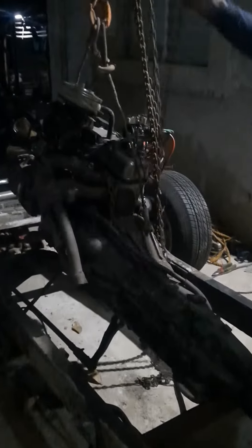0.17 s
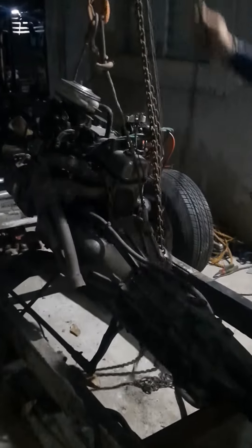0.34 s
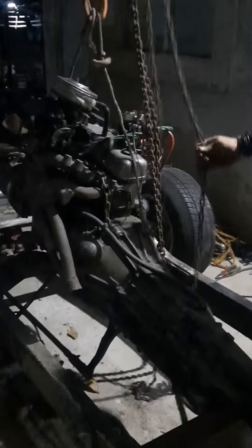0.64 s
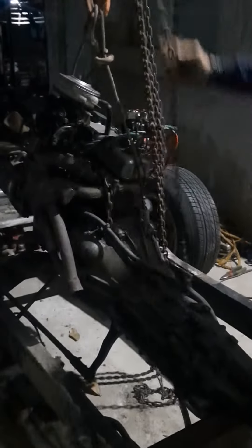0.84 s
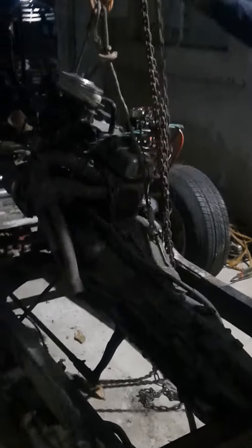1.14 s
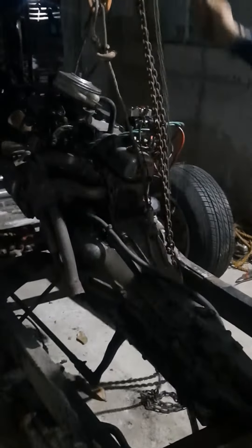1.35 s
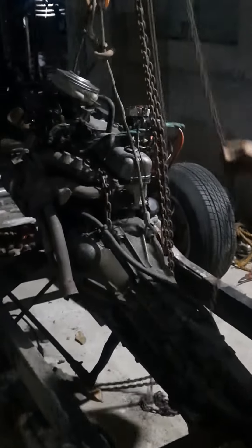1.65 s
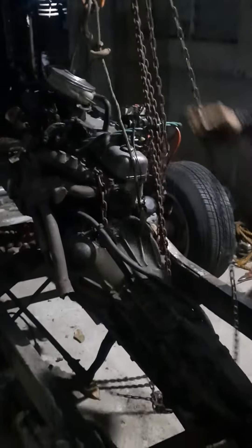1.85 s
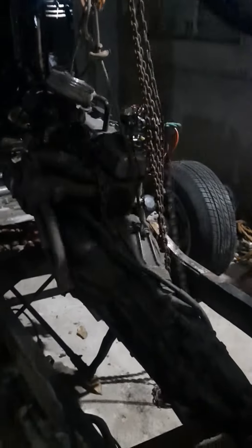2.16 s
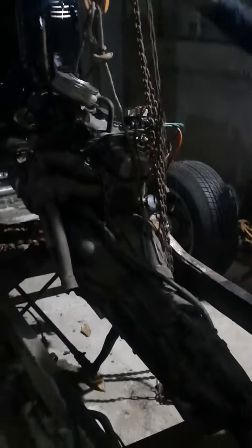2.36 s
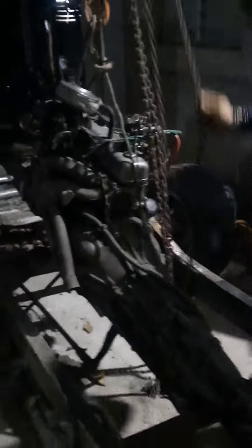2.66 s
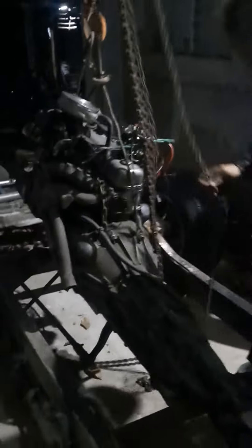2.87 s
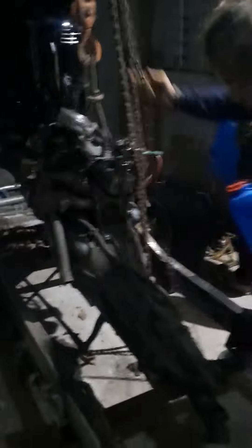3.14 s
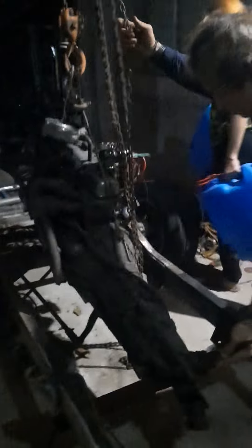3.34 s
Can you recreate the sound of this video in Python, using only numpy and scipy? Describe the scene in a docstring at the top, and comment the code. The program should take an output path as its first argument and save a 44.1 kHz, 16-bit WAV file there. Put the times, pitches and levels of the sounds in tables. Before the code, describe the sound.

A hand chain hoist is hauled three times, each pull a burst of steel rattling and clacking over a low rumble. Slack chain clinks and scrapes softly between pulls, and the last one squeaks briefly, in a small workshop.

```python
"""Steel rattles and clacks in three bursts: a hand chain hoist is being hauled in a small workshop.
In each stroke, impacts of the links on the wheel and of the pawl excite the resonances of the housing,
while the beam overhead rumbles in forced vibration. Between strokes the slack chain clinks by collision
and scrapes by sliding friction. In the last stroke, stick-slip friction makes the loaded wheel squeak."""
import sys
import numpy as np
from scipy import signal
from scipy.fft import rfft, irfft, next_fast_len
from scipy.io import wavfile
from scipy.ndimage import uniform_filter1d, map_coordinates

SR = 44100
rng = np.random.default_rng(int(sys.argv[2]) if len(sys.argv) > 2 else 0)


def inscribe(sig):
    """Save sig as 16-bit PCM at rate SR to the path in sys.argv[1].

    A 1-D sig is mono; a 2-D sig holds one channel per row.
    Samples are clipped to [-1, 1] before scaling.
    """
    pcm = np.round(np.clip(np.atleast_2d(sig).T, -1, 1) * 32767)
    wavfile.write(sys.argv[1], SR, pcm.astype(np.int16))


N = 154350

# reverberation of the workshop (frequency [Hz], time to decay by 60 dB [s])
ROOM_T60 = [(200, 0.4), (1500, 0.28), (5000, 0.29), (9000, 0.22), (15000, 0.29)]
# likeness of the diffuse field at the two ears (frequency [Hz], coherence [ratio])
COHERENCE = [(120, 0.97), (280, 0.85), (600, 0.42), (3000, 0.017)]
# level difference between the ears (frequency [Hz], left over right [dB])
EAR_BALANCE = [(400, 2.16), (1100, -.5), (4200, 1), (8000, 2.5), (11500, 3.5), (15000, 1)]
# spectral envelopes of the sources (frequency [Hz], relative level [dB])
AIR_SPECTRUM = [(25, -35), (60, -0.5), (300, -6.5), (650, -15.5), (1500, -25.5), (15000, -44.5)]
BEAM_SPECTRUM = [(20, -16), (36, -23), (58, 6.5), (82, -8.5), (108, 2.5), (122, 0), (135, 10.5), (152, 3),
                 (195, -10), (290, -1), (400, -14.5), (1200, -22), (4000, -45)]
SLIDE_SPECTRUM = [(200, 8), (700, 4.5), (2400, 0), (3100, -3), (15000, -14.5)]
CLINK_SPECTRUM = [(300, -25), (2800, -5), (4000, 1.5), (7700, 3), (9000, -4.5), (15000, -10)]
JERK_SPECTRUM = [(80, -4.5), (215, 14), (480, -4.5), (1400, 8), (2300, -14.5), (15000, -34)]
STEEL_SPECTRUM = [(150, -7.5), (450, -4), (1000, -7), (1700, 3.5), (2400, -5), (3050, 0), (3800, 2),
                  (7400, -1), (8500, -1), (15700, -2.5)]
# resonances of the steel housing (frequency [Hz], bandwidth [Hz], relative level [dB])
HOUSING_MODES = [(720, 152, 3), (1460, 100, -2), (2106, 75, -0.5), (2354, 190, 1), (2600, 77, 0.5),
                 (3910, 160, -3.5), (4380, 390, -4), (5410, 150, -1.5), (5890, 104, -2.5),
                 (7250, 650, -4.5), (7710, 410, -1), (11500, 1060, -3)]

# Event levels are relative: each source is filtered and scaled afterwards.
# the strokes (full speed from [s], until [s], run-up [s], rattle level [dB], beam level [dB])
PULLS = [(0.271, 0.593, 0.041, -31.5, -38.5), (1.327, 1.681, 0.04, -29.5, -35),
         (2.492, 2.82, 0.097, -29.5, -35.5)]
# the beam booms as the load shifts (time [s], duration [s], level [dB])
BEAM_BOOMS = [(0.091, 0.13, -41.5), (0.486, 0.16, -37), (0.746, 0.2, -39), (1.645, 0.051, -34),
              (2.51, 0.033, -36), (2.645, 0.063, -38.5)]
# slack chain slides as the hand takes a new grip (time [s], duration [s], level [dB])
CHAIN_SLIDES = [(0.108, 0.13, -51.5), (0.904, 0.11, -50.5), (1.883, 0.062, -48), (2.061, 0.14, -49),
                (2.279, 0.15, -53), (3.002, 0.062, -46), (3.152, 0.078, -46.5), (3.24, 0.091, -48)]
# slack links knock together (time [s], level [dB], centre frequency of the ring [Hz])
LINK_CLINKS = [(0.0636, -28, 6510), (0.133, -34, 4070), (0.1426, -23, 4535), (0.237, -26, 4100),
               (1.264, -20.5, 4330), (2.263, -20.5, 5610), (2.389, -28, 5050), (2.997, -30.5, 8100),
               (3.2825, -36.5, 4400), (3.336, -30, 7240), (3.3415, -28, 5100), (3.46, -33, 4630)]
# hanging links clash as the chain is snatched or let go (time [s], duration [s], level [dB])
LINK_CLASHES = [(0.802, 0.019, -38), (1.334, 0.026, -26.5), (2.273, 0.031, -36.5), (2.476, 0.02, -20)]
# the chain snaps taut (time [s], level [dB])
CHAIN_JERKS = [(1.325, -22), (1.351, -30.5), (2.482, -30), (2.511, -27.5)]
# the loaded wheel squeaks (time [s], duration [s], start pitch [Hz], end pitch [Hz], level [dB])
WHEEL_SQUEAKS = [(2.499, 0.046, 708, 683, -29), (2.753, 0.054, 686, 701, -32.5),
                 (2.79, 0.0785, 920, 1037, -34)]
# pawl and links strike inside the hoist (time [s], level [dB])
PAWL_CLACKS = [(0.2629, -17), (0.2866, -18), (0.3207, -20.5), (0.3696, -12.5), (0.408, -14.5),
               (0.445, -13.5), (0.473, -10), (0.4864, -13.5), (0.5107, -10.5), (0.563, -11.5), (0.599, -29),
               (0.6493, -19.5), (0.684, -20.5), (0.717, -19.5), (0.7943, -22), (0.9996, -23.5),
               (1.3513, -11), (1.386, -23), (1.402, -16.5), (1.4358, -11.5), (1.4659, -11.5),
               (1.4805, -11.5), (1.511, -12), (1.553, -16), (1.575, -13), (1.588, -11), (1.6207, -13.5),
               (1.6642, -11.5), (1.7088, -15), (1.7807, -17), (2.048, -30.5), (2.409, -18), (2.4318, -17),
               (2.4767, -15.5), (2.4861, -13.5), (2.5326, -12), (2.611, -9.5), (2.6531, -9),
               (2.6768, -11.5), (2.6874, -8.5), (2.7193, -10.5), (2.7504, -11), (2.7795, -12.5),
               (2.821, -17.5), (2.8558, -16.5), (2.9137, -13.5), (3.377, -31.5)]


def amp(db):
    """Amplitude ratio of a level in decibels."""
    return 10 ** (np.asarray(db) / 20)


def unit(x):
    """Normalisation to an rms of 1."""
    return x / np.sqrt(np.mean(x ** 2) + 1e-20)


def along(points, hz):
    """Interpolation of (frequency, value) points on a logarithmic frequency axis."""
    frequencies, values = np.transpose(points)
    return np.interp(np.log(hz + 1), np.log(frequencies + 1), values)


def tone(spectrum):
    """Gain of a spectral envelope as a function of frequency."""
    return lambda hz: amp(along(spectrum, hz))


def wobble(per_s):
    """Random modulation: a smooth curve through per_s random values a second."""
    knots = rng.standard_normal(int(N * per_s / SR) + 4)
    return map_coordinates(knots, [np.arange(N) * per_s / SR])


def swell(length_s):
    """Amplitude envelope with a rounded rise and fall."""
    return np.sqrt(np.hanning(int(length_s * SR)).clip(0))


def add(track, start_s, sound):
    """Superposition of a sound on the track."""
    part = track[max(0, round(start_s * SR)):][:len(sound)]
    part += sound[:len(part)]


def filtered(x, response):
    """Linear filtering: the spectrum of x is multiplied by a frequency response."""
    size = 2 * next_fast_len(N // 2 + SR // 4)
    return irfft(rfft(x, size) * response(np.fft.rfftfreq(size, 1 / SR)), size)[..., :N]


def coloured(x, gain):
    """Minimum-phase filtering by a gain curve scaled to unit power."""
    def response(hz):
        cepstrum = irfft(np.log(np.maximum(unit(gain(hz)), 1e-6)))
        middle = len(cepstrum) // 2
        cepstrum[1:middle] *= 2  # folding onto positive time makes the filter causal
        cepstrum[middle + 1:] = 0
        return np.exp(rfft(cepstrum))
    return filtered(x, response)


def spread(hz):
    """Interaural coherence as mid and side gains: long waves reach both ears alike."""
    angle = np.arccos(np.clip(along(COHERENCE, hz), -1, 1)) / 2
    return np.array([np.cos(angle), np.sin(angle)])


def diffuse(spectrum):
    """A diffuse field: partly coherent stereo noise of rms 1."""
    mid, side = filtered(rng.standard_normal((2, N)), lambda hz: tone(spectrum)(hz) * spread(hz))
    return unit(np.array([mid + side, mid - side]))


def room(x, tail_db, direct_db=-3, wall_db=-5, wall_s=0.008, echoes=8, pieces=30):
    """Direct sound, early reflections and reverberation, drawn anew piece by piece as the chain swings."""
    out = np.zeros((2, N))
    for k, piece in enumerate(np.array_split(x, pieces)):
        hz, t, noise = signal.stft(rng.standard_normal((2, SR // 2)), SR, nperseg=256)
        decay = amp(-60 * t / along(ROOM_T60, hz)[:, None])
        mid, side = signal.istft(noise * spread(hz)[..., None] * decay, SR, nperseg=256)[1]
        for ear, tail in zip(out, (mid + side, mid - side)):
            response = amp(tail_db) * tail / np.linalg.norm(tail)
            response[0] += amp(direct_db)
            delays = (rng.random(echoes) * wall_s * SR).astype(int)
            response[delays] += amp(wall_db) * rng.standard_normal(echoes) / np.sqrt(echoes)
            add(ear, k * N / pieces / SR, signal.fftconvolve(piece, response))
    return out


def stroke_db(start, stop, rise_s, decay_db_per_s, slack_db=-12):
    """Level of a stroke: exponential growth as slack is taken up, a plateau, then exponential decay."""
    t = np.arange(N) / SR
    return slack_db * np.maximum((start - t) / rise_s, 0) - decay_db_per_s * np.maximum(t - stop, 0)


def strike(crack_t60, ring_hz, ring_db, ring_t60=0.032, scatter=0.1627, partials=5):
    """Impact on steel: a noisy crack and the damped free vibration of a link's inharmonic modes."""
    t = np.arange(SR // 8) / SR
    hz = ring_hz * np.exp(scatter * rng.standard_normal((partials, 1)))
    ring = unit(np.sin(2 * np.pi * hz * t).sum(0)) * amp(-60 * t / ring_t60)
    crack = rng.standard_normal(len(t)) * amp(-60 * t / crack_t60)
    return crack + amp(ring_db) * ring


def air():
    """Ambient noise: a faint, steady, low-pitched diffuse field."""
    return amp(-48) * diffuse(AIR_SPECTRUM)


def beam(sway_db=0.5):
    """Forced vibration: the beam rumbles with each stroke, sways on, and booms when the load shifts."""
    sway, booms = np.zeros(N), np.zeros(N)
    for start, stop, rise_s, _, db in PULLS:
        sway += amp(db + sway_db + stroke_db(start, stop, rise_s, decay_db_per_s=25))
    for start, length, db in BEAM_BOOMS:
        add(booms, start, amp(db) * swell(length))
    rumble = diffuse(BEAM_SPECTRUM)
    local_power = uniform_filter1d(np.mean(rumble ** 2, axis=0), size=SR // 12)
    even_rumble = rumble / np.sqrt(np.abs(local_power) + 1e-9)
    return np.hypot(sway, booms) * even_rumble


def slides(grain_db=3, grains_per_s=150):
    """Sliding friction: the slack chain scrapes softly and unevenly."""
    envelope = np.zeros(N)
    for start, length, db in CHAIN_SLIDES:
        add(envelope, start, amp(db) * swell(length))
    friction = unit(amp(grain_db * wobble(grains_per_s)) * rng.standard_normal(N))
    return coloured(envelope * friction, tone(SLIDE_SPECTRUM))


def clinks(gain_db=-2):
    """Brief, hard contact has a bright spectrum: single knocks between hanging links."""
    out = np.zeros(N)
    for start, db, hz in LINK_CLINKS:
        add(out, start, amp(db + gain_db) * strike(crack_t60=0.011, ring_hz=hz, ring_db=-16))
    return coloured(out, tone(CLINK_SPECTRUM))


def link_rings(start, length, per_s, centre_hz=4500, scatter=0.22, t60=0.021):
    """Damped oscillators: links collide at random moments, each ringing at its own natural frequency."""
    out, t = np.zeros(N), np.arange(SR // 16) / SR
    for when, size in rng.random((int(per_s * length), 2)):
        hz = centre_hz * np.exp(scatter * rng.standard_normal())
        add(out, start + when * length, size * np.sin(2 * np.pi * hz * t) * amp(-60 * t / t60))
    return out


def jingle(running_db=2):
    """Random collisions of free links: sparse as the chain runs, dense when it is snatched or let go."""
    running = sum(amp(db + running_db) * link_rings(start, stop - start, per_s=90)
                  for start, stop, _, db, _ in PULLS)
    clashes = sum(amp(db) * link_rings(start, length, per_s=900) for start, length, db in LINK_CLASHES)
    return running + clashes


def jerks():
    """Impulsive loading: the chain clanks dully as the pull takes up the slack."""
    out = np.zeros(N)
    for start, db in CHAIN_JERKS:
        add(out, start, amp(db) * strike(crack_t60=0.026, ring_hz=1400, ring_db=-18))
    return coloured(out, tone(JERK_SPECTRUM))


def squeaks(octave_db=-11.5, jitter=0.035, jitter_per_s=283):
    """Stick-slip oscillation of the loaded wheel: short, rough, gliding tones with a second harmonic."""
    out = np.zeros(N)
    for start, length, start_hz, end_hz, db in WHEEL_SQUEAKS:
        envelope = swell(length)
        glide_hz = np.linspace(start_hz, end_hz, len(envelope))
        hz = glide_hz * (1 + jitter * wobble(jitter_per_s)[:len(envelope)])
        phase = 2 * np.pi * np.cumsum(hz) / SR
        add(out, start, amp(db) * envelope * (np.sin(phase) + amp(octave_db) * np.sin(2 * phase)))
    return out


def housing(hz, modes_db):
    """Resonance: the modes of the hoist's body raise peaks on the broad spectrum of steel."""
    peaks = sum(amp(db + modes_db) ** 2 / (1 + (2 * (hz - mode_hz) / width_hz) ** 2)
                for mode_hz, width_hz, db in HOUSING_MODES)
    return tone(STEEL_SPECTRUM)(hz) * np.sqrt(1 + peaks ** 2)


def rattle(contacts_per_s=480, spread_db=8, contact_t60=0.0056, lowpass_hz=15000, gain_db=-2.5):
    """Shot noise: many small contacts of links running over the wheel lightly excite the housing."""
    contacts = rng.random(N) < contacts_per_s / SR
    strengths = amp(spread_db * np.clip(rng.standard_normal(N), -2, 1))
    energy_retained = amp(-120 / (contact_t60 * SR))  # from one sample to the next
    energy = signal.lfilter([1], [1, -energy_retained], (contacts * strengths) ** 2)
    grains = unit(np.sqrt(energy) * rng.standard_normal(N))
    envelope = sum(amp(db + stroke_db(start, stop, rise_s, decay_db_per_s=96))
                   for start, stop, rise_s, db, _ in PULLS)
    dulled = filtered(grains * envelope, lambda hz: 1 / np.hypot(1, hz / lowpass_hz))
    return amp(gain_db) * coloured(dulled, lambda hz: housing(hz, modes_db=4))


def clacks(highpass_hz=3200, rebound_s=0.004, rebound_db=-7, gain_db=-4):
    """Impact and elastic rebound: the pawl drops and links seat in the wheel, ringing the housing."""
    out = np.zeros(N)
    for start, db in PAWL_CLACKS:
        rebound_delay = rebound_s * (0.5 + rng.random())
        for delay, loss_db in (0, 0), (rebound_delay, rebound_db):
            impact = strike(crack_t60=0.015, ring_hz=6500, ring_db=-15.5)
            add(out, start + delay, amp(db + gain_db + loss_db) * impact)
    return coloured(out, lambda hz: housing(hz, modes_db=5.5) * hz / np.hypot(hz, highpass_hz))


def scene(left_lead_s=0.000464):
    """Interaural time and level differences: the steel is heard from the left, amid a diffuse rumble."""
    hoist = rattle() + clacks() + jingle() + jerks() + squeaks()
    steel = room(hoist, tail_db=0) + room(clinks() + slides(), tail_db=3.5)
    ear_share = np.array([[0.5], [-0.5]])  # each ear takes half of a difference
    steel = filtered(steel, lambda hz: np.exp(2j * np.pi * hz * ear_share * left_lead_s))
    return filtered(steel + beam() + air(), lambda hz: amp(ear_share * along(EAR_BALANCE, hz)))


def record(dry):
    """Band limiting: an ideal low-pass filter removes everything above 15.8 kHz."""
    return filtered(dry, lambda hz: hz < 15800)


dry = scene()
out = record(dry)
inscribe(out)
```